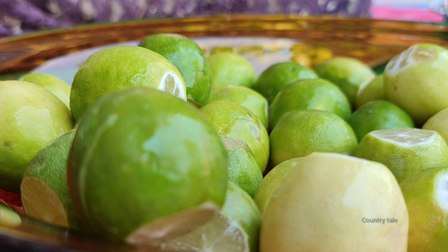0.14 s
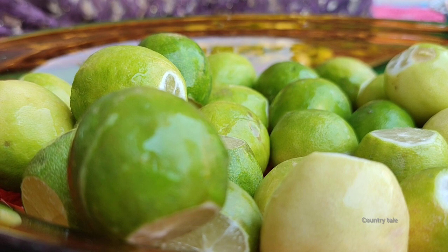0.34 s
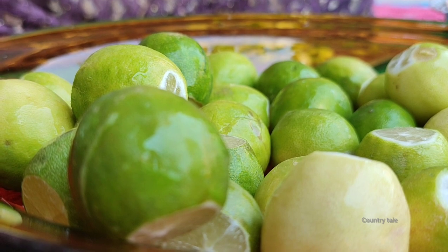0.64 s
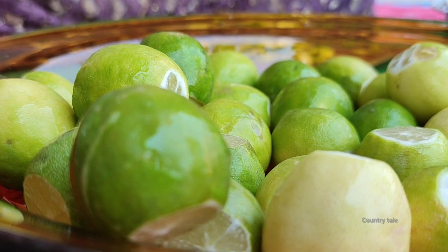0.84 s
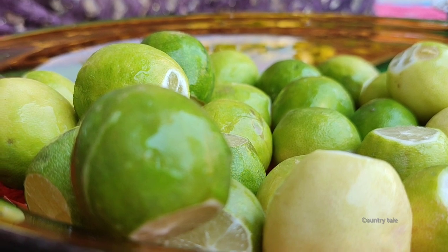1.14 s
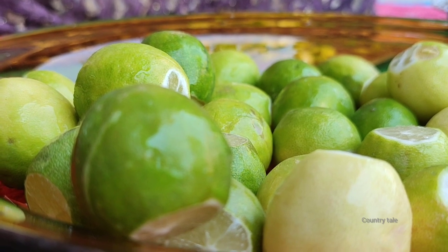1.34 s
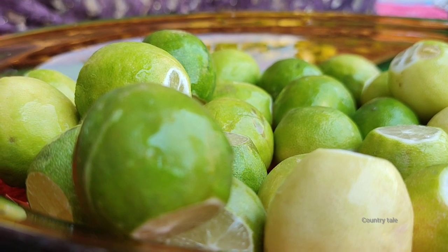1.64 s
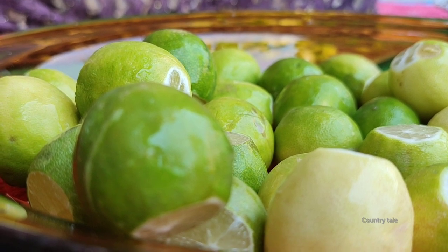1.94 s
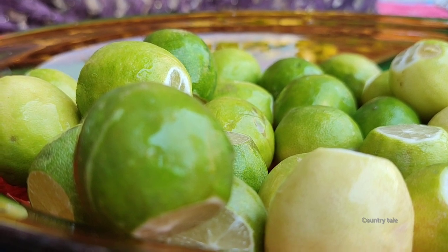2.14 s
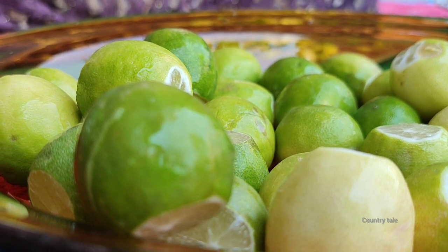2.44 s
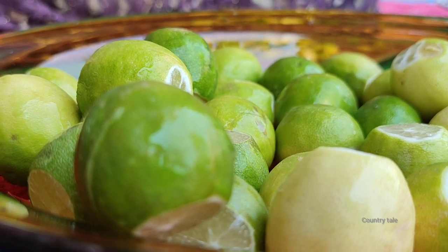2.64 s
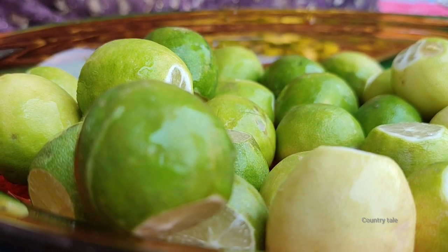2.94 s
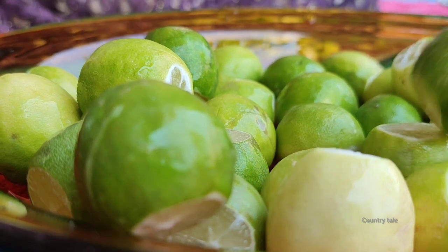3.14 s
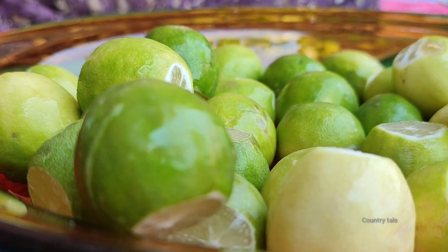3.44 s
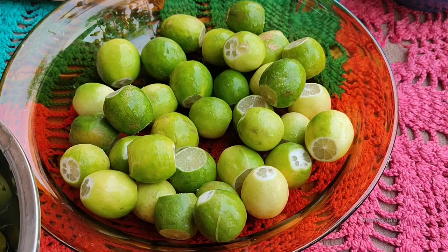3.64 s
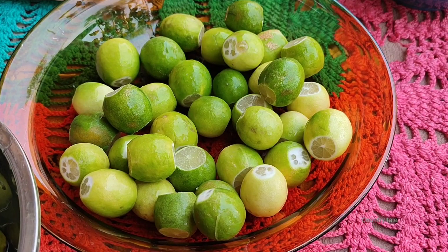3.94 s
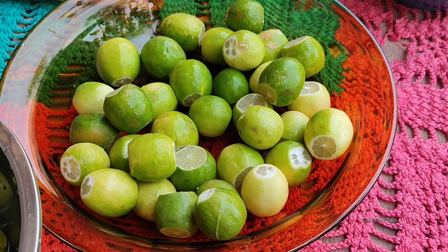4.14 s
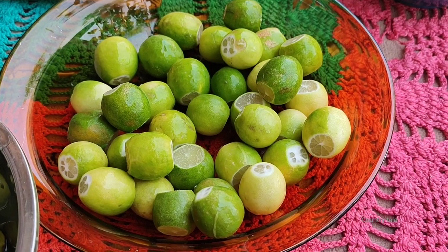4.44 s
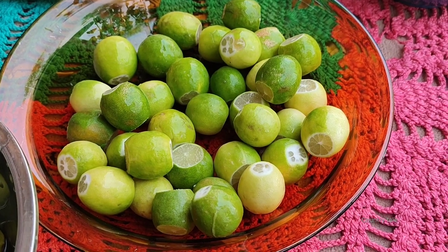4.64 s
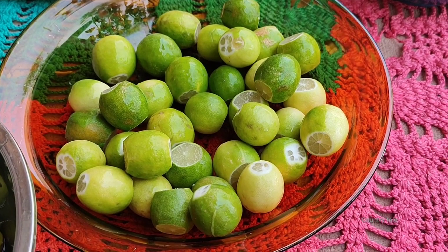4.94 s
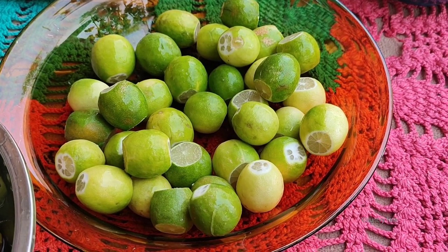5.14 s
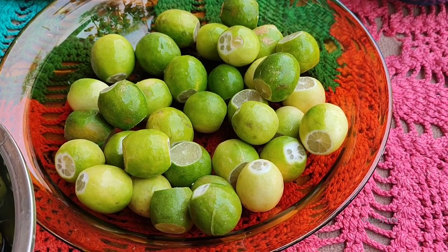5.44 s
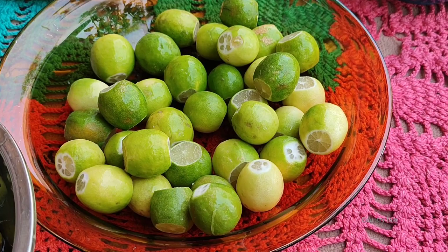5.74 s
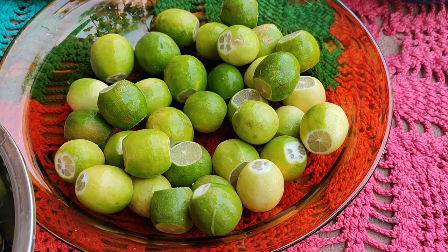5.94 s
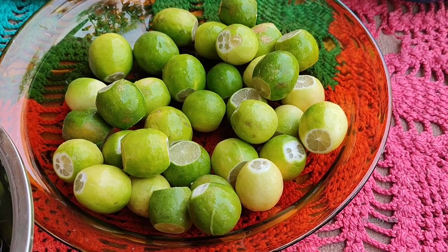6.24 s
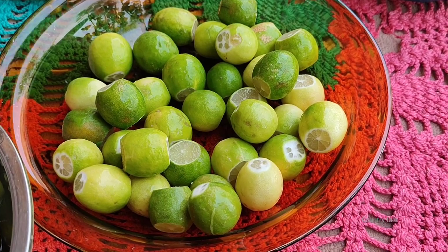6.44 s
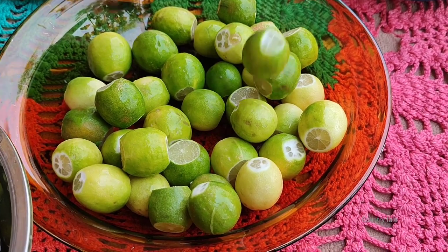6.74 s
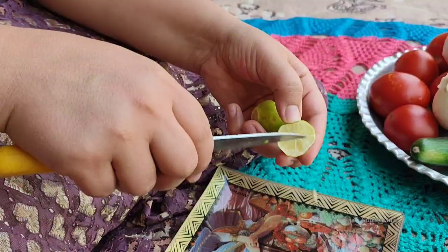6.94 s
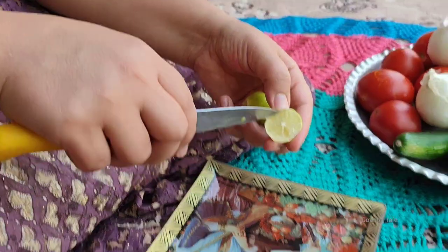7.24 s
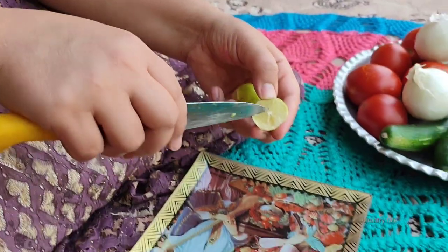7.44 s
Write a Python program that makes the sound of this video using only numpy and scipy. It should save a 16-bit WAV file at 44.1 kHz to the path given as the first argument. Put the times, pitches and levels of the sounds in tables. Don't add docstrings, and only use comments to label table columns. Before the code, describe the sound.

Small birds chip, warble and trill on the right over a distant chuffing pump and low hum, with soft fruit thuds and a ringing knife tap near the end.

```python
import sys
import numpy as np
from scipy import signal
from scipy.io import wavfile
from scipy.ndimage import uniform_filter1d

SR = 44100
rng = np.random.default_rng(int(sys.argv[2]) if len(sys.argv) > 2 else 0)


def wav_out(sig):
    wavfile.write(sys.argv[1], SR, np.round(np.clip(np.atleast_2d(sig).T, -1, 1) * 32767).astype(np.int16))


def attenuation_scalar(level_db):
    decades = np.asarray(level_db, float) / 20
    return 10 ** decades


N = 335601
CHANGE_S, LAST_CHANGE_S = 3.45, 6.89

# (time [s], strokes done [count])
PUMP_STROKES = [(.064, 0), (3.477, 13), (5.587, 21), (7.446, 28)]
# (frequency [Hz], width [Hz], level [dB])
CRACK_MODES = [(1250, 1270, -4.5), (3000, 1020, 1.5), (7090, 430, 4), (12660, 770, -5)]


def rms_one(x):
    return x / np.sqrt(np.mean(x ** 2) + 1e-20)


def in_time(rows):
    s, *columns = np.transpose(rows)
    return [np.interp(np.arange(N) / SR, s, c) for c in columns]


def at_hz(points, hz):
    point_hz, values = np.array(points)[:, 0], np.array(points)[:, 1]
    return np.interp(np.log(hz), np.log(point_hz + 1), values)


def drift(rate_hz):
    r = np.exp(-80 * np.pi * rate_hz / SR)
    slow = signal.lfilter([1], [1, -2 * r, r * r], rng.standard_normal(N // 40 + 2002))[2000:]
    return np.interp(np.arange(N) / 40, np.arange(len(slow)), rms_one(slow))


def add(out, s, piece):
    at = round(s * SR)
    out[..., at:at + piece.shape[-1]] += piece[..., :N - at]


def resonances(x, modes):
    out = 0
    for k, (hz, width_hz, db) in enumerate(modes):
        r = np.exp(-np.pi * width_hz / SR)
        poles = [2, -4 * r * np.cos(2 * np.pi * hz / SR), 2 * r * r]
        out = out + (-1) ** k * attenuation_scalar(db) * signal.lfilter([1 - r * r, 0, r * r - 1], poles, x)
    return out


def struck(modes, length_s, tilt=0):
    # (frequency [Hz], level difference [dB])
    knife_lean = [(900, 7.5), (1800, 5), (3200, -13.5), (4600, 3), (7000, 0), (11000, -3)]
    t = np.arange(round(length_s * SR)) / SR
    out = 0
    for hz, db, t60 in modes:
        decay = attenuation_scalar(db - 60 * t / min(t60, 0.2) + tilt * at_hz(knife_lean, hz))
        pair_beat = 1 + 0.32 * np.sin(0.056 * hz * t + tilt * hz)
        out = out + decay * np.sin(2 * np.pi * hz * t + tilt * hz / 1050) * pair_beat
    return out


def on_right(x, left_db, echo_db, t60):
    t = np.arange(round(0.4 * SR)) / SR
    walls = rng.standard_normal((2, len(t))) * attenuation_scalar(-60 * t / t60) * (t > 0.004)
    tail = signal.fftconvolve(x[None], rms_one(walls) / np.sqrt(len(t)), axes=1)[:, :N]
    direct = np.stack([attenuation_scalar(left_db) * np.roll(x, shift=-11), x])
    return direct + attenuation_scalar(echo_db) * tail * attenuation_scalar([[-9], [0]])


def yard():
    # (rumble [dB], air [dB], hiss [dB], fast throb [dB], hiss of each pump stroke [dB])
    spots = [
        (-49, -65, -64, 7, 0.5),
        (-46, -65, -62.5, 1.5, 4.5),
        (-43.5, -65, -62, 1, 1.5),
    ]
    # (frequency [Hz], density [dB per Hz])
    air_first = [(15, -55), (25, 10), (92, 3), (117, -11.5), (148, -16), (328, -24), (416, -22),
                 (501, -24.5), (573, -23.5), (1240, -32.5), (3130, -20), (5040, -34), (6940, -25.5),
                 (9540, -36), (14200, -34)]
    # (frequency [Hz], density [dB per Hz])
    air_later = [(15, -41), (25, 9.5), (72, 0.5), (108, -11.5), (148, -19), (209, -18), (365, -30.5),
                 (573, -23), (853, -30), (1410, -28.5), (2810, -23), (4300, -34.5), (6940, -28),
                 (9790, -36), (14200, -41)]
    # (frequency [Hz], left-right likeness [-1 to 1])
    likeness = [(60, 0.85), (130, 0.8), (290, 0.53), (640, 0.59), (1400, -0.14), (3090, 0.089),
                (6780, -0.016), (14900, -0.74)]
    # (frequency [Hz], level difference [dB])
    lean = [(60, 2), (110, 1.5), (200, 1.5), (380, 0), (700, -0.2), (1290, 1), (2370, -7), (4380, -6),
            (8080, -0.5), (14900, 3)]
    # (time [s], level [dB])
    breeze = [(0, 4), (1.0, 1.5), (2.0, 1.5), (3.0, 1.7), (3.4, -2), (3.7, 0.5), (4.5, 1.5), (5.2, -0.3),
              (5.8, 1.2), (6.6, 0.8), (7.6, 1.5)]
    throb_s, throb_start_s, throb_fall_s = 0.0779, 0.052, 0.049
    stroke_hiss_s = 0.029

    t = np.arange(N) / SR
    rumble_db, air_db, hiss_db, throb_db, stroke_db = np.transpose(spots)[:, np.digitize(t, [CHANGE_S, LAST_CHANGE_S])]
    breeze_db, = in_time(breeze)
    turn = (t - throb_start_s) / throb_s % 1
    throb = throb_db * uniform_filter1d(np.exp(-turn * throb_s / throb_fall_s), size=100)
    done = np.interp(t, *np.transpose(PUMP_STROKES))
    stroke = np.exp(-((done - np.round(done)) * 0.4 / stroke_hiss_s) ** 2)

    zones = [0, 0, 0]
    edges_hz = 22 * 2 ** np.arange(0, 9.7, 0.3)
    white, together = rng.standard_normal((2, 2, N)), drift(9.0)
    for k, (low, high) in enumerate(zip(edges_hz, edges_hz[1:])):
        band = signal.butter(2, [low, high], "band", fs=SR, output="sos")
        mid, side = signal.sosfilt(band, white[k % 2])
        hz = np.sqrt(low * high)
        alike, lean_db = at_hz(likeness, hz), at_hz(lean, hz)
        colour_db = np.where(t < CHANGE_S, at_hz(air_first[:-1], hz), at_hz(air_later[:-1], hz))
        gain = attenuation_scalar(colour_db + 0.68 * together + 2.67 * np.clip(drift(25.5), -3, 1.7))
        pair = np.sqrt(1 + alike) * mid + np.sqrt(1 - alike) * side * [[1], [-1]]
        zones[np.digitize(hz, [140, 1400])] += gain * pair * attenuation_scalar([[lean_db / 2], [-lean_db / 2]])

    rumble, air, hiss = zones
    top = signal.sosfilt(signal.butter(2, 4800, "high", fs=SR, output="sos"), hiss)
    hiss = hiss + top * (attenuation_scalar(throb + stroke_db * stroke) - 1)
    hiss = hiss * attenuation_scalar(0.8 * drift(6) + 0.7 * drift(20))
    out = attenuation_scalar(rumble_db - 6.5 - drift(0.5)) * rms_one(rumble)
    out = out + attenuation_scalar(air_db + 3.0 + 0.14 * breeze_db) * rms_one(air)
    return out + attenuation_scalar(hiss_db + 5 + breeze_db) * rms_one(hiss)


def hums():
    # (time [s], level [dB])
    motor = [(0.0, -60.5), (2.6, -59.5), (3.2, -60), (3.6, -61.5), (3.8, -53.5), (4.12, -62), (4.45, -53.5),
             (5.3, -62), (6.4, -54), (6.9, -62), (7.61, -60)]
    # (time [s], frequency [Hz], level [dB])
    vehicle = [(3.475, 68.8, -48.5), (3.6, 68.77, -52), (4.3, 69.6, -52.5), (5.1, 73.3, -54),
               (5.8, 75.7, -60), (6.5, 78, -64)]
    # (time [s], frequency [Hz], level [dB])
    mains = [(6.95, 50.4, -48), (7.25, 51, -48), (7.61, 50.3, -48)]
    # (frequency [Hz], width [Hz], level [dB])
    drone_line = (40.4, 3.8, -57)
    # (frequency [Hz], width [Hz], level [dB])
    whine_line = (1050, 30, -79)
    motor_hz = 97.5

    out, t = 0, np.arange(N) / SR
    motor_rows = [(s, motor_hz, db) for s, db in motor]
    for rows, waver_db in [(motor_rows, 2.2), (vehicle, 0.9), (mains, 1.3)]:
        hz, db = in_time(rows)
        on = uniform_filter1d(1.0 * (t >= rows[0][0]) * (t <= rows[-1][0]), size=900)
        level = on * attenuation_scalar(db + waver_db * drift(6))
        out = out + level * whistle(hz * (1 + 0.016 * drift(8)), overtone_db=-22)
    for (hz, width_hz, db), on in [(drone_line, t < LAST_CHANGE_S), (whine_line, t > CHANGE_S)]:
        out = out + attenuation_scalar(db) * rms_one(resonances(rng.standard_normal(N), [(hz, width_hz, 0)])) * on
    return out * attenuation_scalar([[0.4], [-0.4]])


def pump():
    # (frequency [Hz], width [Hz], level [dB])
    chuff_modes = [(1644, 190, 4), (2600, 330, 12), (3300, 1570, 1.5)]
    # (time [s], level [dB])
    pump_level = [(0, -41.5), (1.5, -40.5), (3, -42), (4, -44.5), (5, -41), (5.7, -40), (6.4, -48.5),
                  (7.6, -42)]
    s, done = np.transpose(PUMP_STROKES)
    t, puffs = np.arange(-0.03, 0.03, 1 / SR), np.zeros(N)
    swell = np.where(t < 0, attenuation_scalar(14 * t / 0.018), attenuation_scalar(-60 * t / 0.058))
    swell = swell + 0.75 * np.exp(-np.abs(t) / 0.00088)
    stroke_s = np.interp(np.arange(done[-1] + 1), done, s)
    for at, spread in zip(stroke_s, rng.normal(0, 1, 29)):
        add(puffs, at + t[0], attenuation_scalar(0.69 * spread) * swell)
    grain = attenuation_scalar(2.5 * drift(200)) * rng.standard_normal(N)
    puffs = attenuation_scalar(*in_time(pump_level)) * resonances(puffs * grain, chuff_modes)
    puffs = signal.sosfilt(signal.butter(2, [1400, 4300], "band", fs=SR, output="sos"), puffs)
    return on_right(puffs, left_db=-20.0, echo_db=-8.0, t60=0.062)


def ticks():
    # (time [s], peak [dB], left minus right [dB], body [dB])
    brief_ticks = [(0.0054, -43, -6, 11), (0.1548, -50, -5, 14), (0.297, -50, -8, -5),
                   (0.37, -48.5, -5, -11), (0.45, -50, -9, -7), (0.83, -49, -6, -20), (1.1158, -46.5, -7, 1),
                   (1.2236, -48.5, -2, -4), (1.9203, -45, -5, -15), (2.229, -46, -4, -2),
                   (2.2458, -41.5, -2, -6), (2.628, -50, -8, -4), (4.0724, -46.5, -2, -4),
                   (4.4224, -39.5, 2, -6), (4.4326, -44, -10, 0), (4.476, -37.5, -4, -1),
                   (4.771, -47.5, -6, 28), (4.889, -54, -1.5, -6), (5.2809, -49.5, 1, -2),
                   (5.549, -48, -5, 1), (5.6594, -54, -9, 13), (5.983, -41.5, 1, -8), (6.786, -44.5, -9, 8),
                   (3.074, -43, 0.5, 12), (7.438, -50, -4, 20), (7.448, -48, -6, 12), (7.599, -54, -3, -2),
                   (4.905, -53, -2, -7), (4.918, -56, -2, -7), (0.523, -55, -3, -12)]
    ring_s = 0.014
    out, t = np.zeros((2, N)), np.arange(round(0.06 * SR)) / SR
    for s, db, pan_db, body_db in brief_ticks:
        noise = rng.standard_normal((2, len(t)))
        puff = (noise[0] + 7.3 * noise) * attenuation_scalar(-30 * t / ring_s)
        burst = resonances(puff, CRACK_MODES[2:]) + attenuation_scalar(body_db) * resonances(puff, CRACK_MODES[:2])
        add(out, s, attenuation_scalar(db + 7.0) * burst / np.abs(burst).max() * attenuation_scalar([[pan_db / 2], [-pan_db / 2]]))
    return out


def thuds():
    # (time [s], peak [dB], brightness [Hz], rim ring [dB])
    drops = [
        (2.247, -46, 300, -8),
        (3.069, -25, 400, 1.5),
        (3.113, -37, 500, -11),
        (3.131, -39, 300, -9),
        (3.197, -39, 300, -14),
        (6.788, -28, 1520, -11.5),
    ]
    # (frequency [Hz], level [dB], t60 [s])
    dish = [(1130, -15, 0.037), (90, 18.5, 0.015), (213, 9, 0.034), (383, 6.5, 0.023), (513, 1.5, 0.12)]
    # (frequency [Hz], level [dB], t60 [s])
    dish_later = [(215, 9.5, 0.033), (320, -3, 0.018), (624, -4.5, .035), (1120, -12, .03)]
    out = np.zeros(N)
    rim = np.roll(struck(dish[-1:], length_s=0.2), shift=180)
    for s, db, cut_hz, rim_db in drops:
        body = struck(dish[:-1] if s < CHANGE_S else dish_later, length_s=0.2) + attenuation_scalar(rim_db) * rim
        touch = signal.butter(2, [0.12 * cut_hz, cut_hz], "band", fs=SR)
        add(out, s, attenuation_scalar(db - 13.0) * signal.lfilter(*touch, body))
    return out * attenuation_scalar([[0.5], [-0.5]])


def knife():
    # (time [s], peak [dB])
    taps = [
        (7.039, -24.5),
        (7.125, -23),
        (7.192, -31),
        (7.262, -38.5),
    ]
    # (frequency [Hz], level [dB], t60 [s])
    first_tap = [(927, 2.5, 0.13), (1790, -5, 0.11), (2420, -31, 5.0), (2560, -24, 0.076), (3140, -9, 0.18),
                 (3280, -11, 0.24), (4530, 0, 0.13), (4720, -25, 0.099), (6100, -23, 0.094),
                 (6350, -9, 0.12), (7340, -15, 0.1), (8700, -18, 0.12)]
    # (frequency [Hz], level [dB], t60 [s])
    bounce = [(926, -9.5, 0.14), (1780, -15, 0.3), (3050, -5.5, 0.15), (3190, -10, 0.068), (4680, -1, 0.13),
              (4960, -6, 0.076), (6100, -1, 0.068), (6400, -3, 0.076), (7080, 0, 0.07), (7321, -8, 0.05),
              (8720, 0.5, 0.074), (8830, -4.5, 0.058), (10870, -15, 0.057)]
    # (frequency [Hz], level [dB], t60 [s])
    last_bounces = [(1050, -10, 0.66), (2681, -23, 4.9), (3290, -3.5, 0.22), (4000, -27, 0.35),
                    (4500, -7, 0.11), (5250, -13, 0.36), (6470, -6, 0.11), (7450, -6, 0.06)]
    out, t = np.zeros((2, N)), np.arange(round(0.3 * SR)) / SR
    touch = (1 - np.exp(-t / 0.0012)) * (1.19 + np.exp(-t / 0.0033))
    for (s, db), modes in zip(taps, [first_tap, bounce, last_bounces, last_bounces]):
        crack = attenuation_scalar(5.5 - 60 * t / 0.041) * resonances(rng.standard_normal((2, len(t))), CRACK_MODES)
        ring = np.stack([struck(modes, length_s=0.3, tilt=side) for side in (0.5, -0.5)])
        add(out, s, attenuation_scalar(db - 15.5) * touch * (ring + crack))
    return out


def whistle(hz, overtone_db):
    phase = 2 * np.pi * np.cumsum(hz) / SR
    return np.sqrt(2) * (np.sin(phase) + attenuation_scalar(overtone_db) * np.sin(2 * phase))


def note(length_s, start_hz, middle_share, end_hz, overtone_db, rough=0.01, swell_db=0, roundness=0.57):
    # (frequency [Hz], width [Hz])
    flick_throat = (3120, 1900)
    throat_hz, width_hz = flick_throat
    u = np.linspace(0, 1, round(length_s * SR))
    middle_hz = start_hz + middle_share * (end_hz - start_hz)
    hz = np.polyval(np.polyfit([0, 0.5, 1], [start_hz, middle_hz, end_hz], deg=2), u)
    wobble = np.interp(u, np.linspace(0, 1, 9), rng.standard_normal(9))
    level_db = 150 * rough * wobble[::-1] + swell_db * (u - 0.5)
    throat = 1 / (1 + (np.maximum(hz - throat_hz, 0) / width_hz * 2) ** 2)
    envelope = np.sin(np.pi * u) ** roundness * throat * attenuation_scalar(level_db)
    return envelope * whistle(hz * (1 + rough * wobble), overtone_db - 16 * u)


def chip(start_hz, top_hz, end_hz):
    # (share of length [0-1], width [share], level [dB])
    level_dip = (.58, .05, -6)
    at, width, dip_db = level_dip
    length_s, top_share, attack_s, fade_db = 0.019, 0.37, 0.0022, 15
    u = np.linspace(0, 1, round(length_s * SR))
    rising = u < top_share
    off = np.where(rising, 1 - u / top_share, (u - top_share) / (1 - top_share))
    hz = top_hz - off ** 1.59 * np.where(rising, top_hz - start_hz, top_hz - end_hz)
    shake = rng.standard_normal(2)
    level_db = dip_db * np.exp(-((u - at - 0.041 * shake[0]) / width) ** 2)
    level_db = level_db - fade_db * u ** 2 + 4 * u * np.sin(45 * u + 2 * shake[1])
    edges = np.clip(u * length_s / attack_s, 0, 1) ** 2 * np.clip((1 - u) * 8, 0, 1)
    return edges * attenuation_scalar(level_db) * whistle(hz, overtone_db=-35)


def rising_call(s, length_s, top_hz, db, swell_db):
    # (share of length [0-1], pitch [share of top], level [dB], warble depth [share])
    call_shape = [(0, 0.57, -30, 0.36), (0.198, .84, -6, 0.93), (.42, .93, 1.5, 0.76),
                  (.62, .975, 1.5, 0.59), (.78, 1.001, 3.5, .16), (.93, .95, -2.5, 0.075),
                  (0.999, 0.73, -45, .08)]
    share, pitch, shape_db, depth = np.transpose(call_shape)
    depth_hz = 300 + 0.66 * (top_hz - 2970)
    level_db = db + shape_db + swell_db * (share - 0.5)
    return np.transpose([s + length_s * share, top_hz * pitch, level_db, depth_hz * depth])


def warble(rows, rate_hz, reedy_db, beat_db, first_s, unevenness):
    # (frequency [Hz], width [Hz])
    throat = (2700, 1640)
    throat_hz, width_hz = throat
    beat_lead_rad = 0.89
    flat_top = 0.32
    s, *columns = np.transpose(rows)
    t = np.arange(s[0], s[-1], 1 / SR)
    centre_hz, level_db, depth_hz = [np.interp(t, s, c) for c in columns]
    uneven = np.interp(t, np.linspace(s[0], s[-1], 16), rng.standard_normal(16))
    turn = 2 * np.pi * rate_hz * (t - s[0] - first_s) + unevenness * uneven
    hz = centre_hz + depth_hz * (1 + 0.3 * unevenness * uneven[::-1]) * np.sin(turn)
    centre_loss, loss = [1 + ((f - throat_hz) / width_hz * 2) ** 2 for f in (centre_hz, hz)]
    pulse = np.sin(turn + beat_lead_rad)
    rises = centre_hz[-1] > centre_hz[0]
    beat = attenuation_scalar(beat_db * depth_hz / 450 * (pulse - flat_top * rises * pulse ** 2))
    overtone_db = reedy_db - 0.039 * (centre_hz - 1908)
    return attenuation_scalar(level_db) * beat * centre_loss / loss * whistle(hz, overtone_db)


def birds():
    # (time [s], length [s], top [Hz], level [dB], swell start to end [dB])
    rising = [(1.4554, 0.072, 3167, -33, 6.5), (5.436, 0.1, 3168, -27.5, -0.5),
              (5.884, 0.099, 3132, -25.5, -2), (6.621, 0.08, 2874, -26.5, 8)]
    # (time [s], centre pitch [Hz], level [dB], warble depth [Hz])
    falling_call = [(6.798, 2700, -48, 300), (6.819, 2840, -40, 330), (6.851, 2940, -37.5, 350),
                    (6.861, 2930, -32.5, 200), (6.873, 2710, -26, 120), (6.881, 2500, -31.5, 90),
                    (6.885, 2330, -42, 150), (6.9, 1970, -48, 150)]
    # (time [s], centre pitch [Hz], level [dB], warble depth [Hz])
    sliding_call = [(6.92, 1414, -58, 17.5), (6.952, 1890, -47, 44), (6.963, 2107, -31.5, 40),
                    (6.977, 2310, -29, 61), (6.99, 2420, -40, 120), (7.003, 2386, -33.5, 130),
                    (7.035, 2476, -41, 300), (7.066, 2490, -43.5, 350), (7.1, 2390, -53, 300)]
    # (warble rate [Hz], second partial at low pitch [dB], level beat [dB], first swing [s], unevenness [rad])
    voices = [
        (185.4, 5, 5, .001, 0.58),
        (192, -3.5, 5.5, 0.0023, .2),
        (198, 1, 4.5, 0.0022, .2),
        (167, -21, 7, .001, 0.64),
        (182.6, -24, 9, 0.0011, 0.54),
        (145, -26, 6, .001, 1.3),
    ]
    # (time [s], length [s], start [Hz], end [Hz], level [dB])
    short_notes = [(0.156, 0.011, 2760, 2500, -48), (0.513, 0.027, 2090, 2350, -51.5),
                   (0.81, 0.035, 2420, 2580, -57), (1.688, 0.034, 2270, 2350, -54.5),
                   (2.28, 0.044, 1960, 2810, -53), (2.453, 0.017, 2120, 2490, -53),
                   (4.741, 0.04, 1960, 2390, -55), (5.55, 0.017, 1960, 2400, -50.5),
                   (6.446, 0.015, 1980, 2750, -36), (6.458, 0.021, 2050, 2380, -34.5),
                   (6.489, 0.012, 2100, 2700, -37.5), (6.499, 0.012, 2050, 2320, -35.5),
                   (6.512, .013, 2280, 2160, -47), (6.557, 0.04, 2130, 2490, -52)]
    # (time [s], length [s], start [Hz], end [Hz], level [dB])
    chatter = [(6.221, 0.01, 2900, 3450, -44), (6.229, 0.0057, 2270, 5000, -30),
               (6.246, 0.006, 4700, 2290, -29.5), (6.255, 0.013, 2470, 3120, -26.5),
               (6.267, 0.012, 2880, 3700, -37), (6.279, 0.005, 2180, 4000, -31),
               (6.282, 0.009, 2644, 3300, -27), (6.293, 0.0054, 2600, 3300, -45),
               (6.298, 0.0044, 4270, 2240, -30), (6.303, 0.0122, 2600, 3360, -28.5),
               (6.316, 0.0053, 3300, 2120, -32.5), (6.321, 0.0072, 3300, 1950, -35.5),
               (6.326, 0.014, 3260, 2320, -39)]
    # (time [s], level [dB], start [Hz], top [Hz], end [Hz])
    chips = [(3.93, -35, 2550, 3420, 3000), (3.959, -32.5, 2720, 3390, 2950),
             (3.992, -33.5, 2940, 3363, 2830), (4.036, -40.5, 3000, 3400, 3000),
             (4.587, -28, 2900, 3360, 2420), (4.615, -27.5, 2930, 3394, 2610),
             (4.647, -29, 2850, 3450, 2940), (4.686, -32.5, 2850, 3400, 2800),
             (6.233, -44, 5100, 6100, 5600)]
    # (time [s], level [dB], end [Hz], swell [dB])
    trills = [(2.613, -50.5, 2600, 3), (2.644, -48, 2600, -4), (2.677, -49, 2690, -2),
              (2.713, -52, 2380, -3), (2.985, -49, 2800, -2), (3.013, -46, 2900, 4),
              (3.041, -46.5, 2900, 3), (3.072, -49, 2800, 0), (3.107, -48, 2700, -1), (3.642, -49, 2750, 3),
              (3.667, -45, 2870, 9), (3.695, -44.5, 2950, 4), (3.725, -45.5, 3000, 4),
              (3.756, -44, 3066, 3), (3.793, -45.5, 2940, 2), (3.837, -47.5, 2800, -3),
              (7.481, -56, 2700, 0), (7.502, -47, 3030, 7), (7.524, -40.5, 3300, 11),
              (7.55, -41.5, 3370, 16), (7.579, -42, 3300, 11)]
    # (length [s], start [Hz], share of the rise done at the middle [0-1])
    trill_note = (.0205, 1950, 0.403)

    near, far = np.zeros(N), np.zeros(N)
    calls = [rising_call(*row) for row in rising] + [falling_call, sliding_call]
    for rows, voice in zip(calls, voices):
        add(near, rows[0][0], warble(rows, *voice))
    for s, length_s, start_hz, end_hz, db in short_notes + chatter:
        add(near, s, attenuation_scalar(db) * note(length_s, start_hz, 0.55, end_hz, overtone_db=-30))
    for s, db, *arch_hz in chips:
        add(near, s, attenuation_scalar(db + 0.5) * chip(*arch_hz))
    length_s, start_hz, share = trill_note
    for s, db, end_hz, swell_db in trills:
        trill = note(length_s, start_hz, share, end_hz, -11, rough=0.008, swell_db=swell_db, roundness=0.6)
        add(far, s, attenuation_scalar(db) * trill)
    near = on_right(near, left_db=-15.0, echo_db=-14, t60=0.12)
    return near + on_right(far, left_db=-13.5, echo_db=-7.0, t60=0.084)


def scene():
    left, right = yard() + hums() + thuds()
    left = np.where(np.arange(N) < CHANGE_S * SR, np.roll(left, 6), left)
    return birds() + pump() + ticks() + knife() + [left, right]


def band_limit(x):
    return signal.sosfilt(signal.butter(12, 15520, fs=SR, output="sos"), x)


def record(dry):
    top_cut = signal.ellip(12, 0.5, 70, 14350, fs=SR, output="sos")
    return band_limit(signal.sosfilt(top_cut, dry) - 0.0007)


dry = scene()
out = record(dry)
wav_out(out)
```